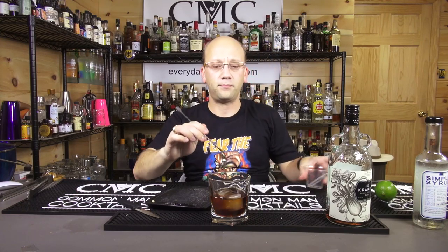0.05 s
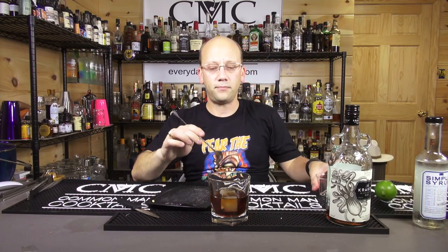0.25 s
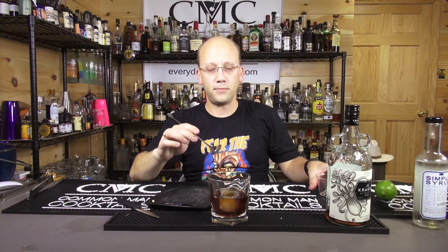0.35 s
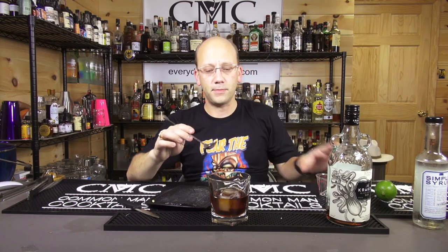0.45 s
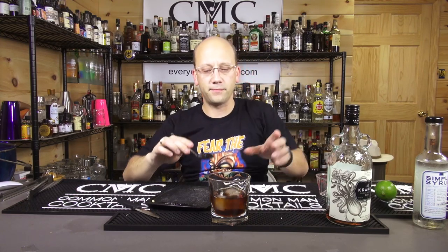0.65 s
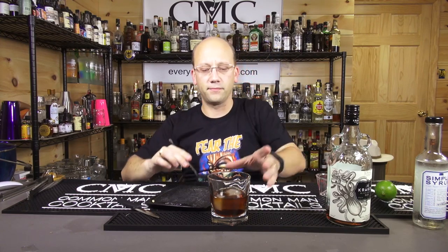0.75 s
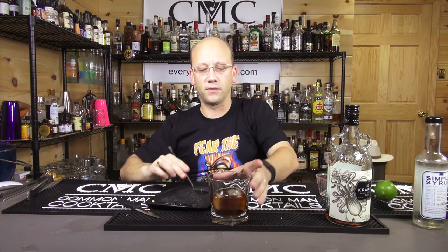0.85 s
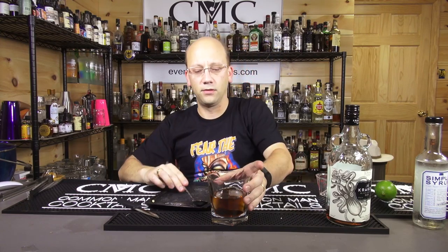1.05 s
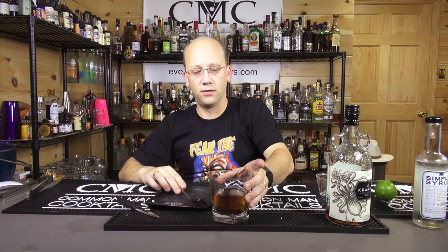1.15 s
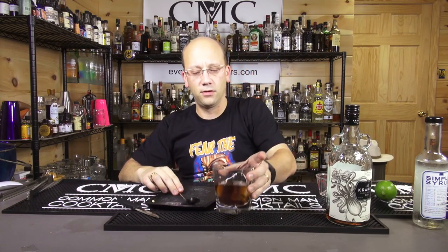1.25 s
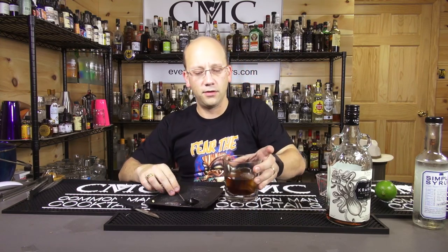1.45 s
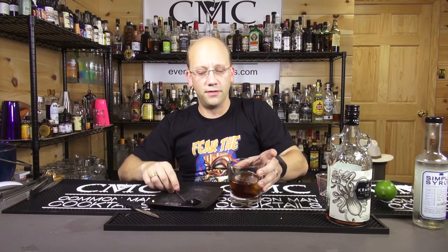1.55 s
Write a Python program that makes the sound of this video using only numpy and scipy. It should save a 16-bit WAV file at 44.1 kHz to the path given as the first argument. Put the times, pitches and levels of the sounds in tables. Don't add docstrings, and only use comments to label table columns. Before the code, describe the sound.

A glass clinks brightly at about 0.23 seconds, its ring fading over a soft set-down rumble near 0.3 and faint scuffs until 0.7. A gritty scrape at 1.0 starts ice and spoon knocking in a full tumbler, hardest from 1.25 to 1.4 with thin steely ringing, then lighter taps at 1.47 and 1.56. Wood rumbles below; quiet hum, hiss and short room reflections surround it.

```python
import sys
import numpy as np
from scipy import signal
from scipy.fft import rfft, irfft, next_fast_len
from scipy.io import wavfile
from scipy.ndimage import map_coordinates

SR = 44100
rng = np.random.default_rng(int(sys.argv[2]) if len(sys.argv) > 2 else 0)


def bounce(signal):
    frames = np.transpose(np.atleast_2d(signal))
    limited = np.clip(frames, -1, 1)
    pcm = np.round(limited * 32767).astype(np.int16)
    wavfile.write(sys.argv[1], SR, pcm)


def gain_from_decibels(decibels):
    exponent = np.asarray(decibels, float) / 20
    return 10 ** exponent


N = 70560

WET_DB = -10


def unit(x):
    return x / np.sqrt(np.mean(x ** 2) + 1e-20)


def along(points, hz):
    f, v = np.transpose(points)
    return np.interp(np.log(hz + 1), np.log(f + 1), v)


def filtered(x, response):
    m = next_fast_len(len(x) + 4096)
    return irfft(rfft(x, m) * response(np.fft.rfftfreq(m, 1 / SR)), m)[:len(x)]


def resonance(f, centre_hz, width_hz):
    drag = 1j * f * width_hz
    return drag / (centre_hz * centre_hz - f * f + drag)


def wobble(rate_hz):
    knots = rng.standard_normal(int(N * 400 / SR) + 4)
    return map_coordinates(knots, [np.arange(N) * min(rate_hz, 400) / SR])


def fade(t, t60_s):
    return gain_from_decibels(-60 * t / t60_s)


def sine(hz, t):
    return np.sin(2 * np.pi * hz * t)


def add(track, s, sound, wet_db):
    # f/Hz, t60/s
    room = [(150, 0.32), (1000, 0.38), (3000, 0.61), (8000, 0.37), (15000, 0.13)]
    wall_s = 0.0044
    hz, t, z = signal.stft(rng.standard_normal(SR // 2), SR, nperseg=256)
    decay = fade(t, along(room, hz)[:, None])
    tail = signal.istft(z * decay, SR, nperseg=256)[1]
    tail = np.pad(tail / np.linalg.norm(tail), (round(wall_s * SR), 0))
    at = round(s * SR)
    track[at:at + len(sound)] += sound
    wet = signal.fftconvolve(sound, gain_from_decibels(wet_db) * tail)[:SR]
    track[at:at + len(wet)] += wet


def floor():
    # f/Hz, level/dB
    partials = [(60.5, -65), (120, -68), (180, -67.5), (240, -75.5), (3275, -74), (3320, -81)]
    # f/Hz, density/dB per Hz
    hiss_curve = [(15, -24.5), (25, -22), (123, -5.5), (229, -11.5), (309, -8.5), (2110, -15.5),
                  (3340, -12), (3720, -16), (16000, -21.5)]
    hiss_db = -60
    t = np.arange(N) / SR
    hum = 0
    for hz, db in partials:
        level = gain_from_decibels(db + 0.5 + 1.3 * wobble(14))
        hum = hum + level * np.sin(2 * np.pi * hz * t + 0.33 * wobble(2.5))
    hiss = filtered(rng.standard_normal(N), lambda f: gain_from_decibels(along(hiss_curve, f)))
    return hum + gain_from_decibels(hiss_db) * unit(hiss)


def scuffs():
    # t/s, level/dB, hold/s, centre f/Hz, width/octaves
    rubs = [(0.988, -52.5, 0.025, 900, 0.84), (0.141, -60.5, 0.039, 890, 0.8),
            (0.153, -62, .008, 6500, 0.12), (0.253, -50.5, 0.059, 600, 0.43),
            (.52, -60.5, 0.081, 1080, 0.75), (0.543, -57, 0.004, 4030, 0.57),
            (0.563, -53, 0.011, 2500, 0.79), (.652, -47.5, .025, 1480, 1.22),
            (.653, -49.5, 0.028, 7130, 0.38), (.9335, -45.5, 0.0022, 11500, 0.74),
            (0.986, -36, 0.026, 8700, 0.98), (1.007, -28.5, .008, 3600, 0.44),
            (1.179, -49.5, 0.11, 1170, 1.06)]
    # f/Hz, level/dB, t60/s
    squeak = [(5750, -48.5, 0.34), (6340, -48.5, 0.24), (2180, -50.5, 0.13), (387.5, -42.5, 0.084),
              (600, -44, 0.079), (1090, -54, 0.17)]
    squeak_s, grit_db = 0.657, 3
    t60_s, release_share = 0.01, 2.7
    out, t = np.zeros(N + SR), np.arange(SR // 3) / SR
    for s, db, hold_s, hz, octaves in rubs:
        band = lambda f: np.exp(-0.5 * (np.log2((f + 1) / hz) / octaves) ** 2)
        grit = gain_from_decibels(grit_db * wobble(300)[:len(t)])
        rub = unit(filtered(rng.standard_normal(len(t)), band) * grit)
        rise = np.clip(t / (0.077 * hold_s), 0, 1)
        release = fade(np.maximum(t - hold_s, 0), t60_s + release_share * hold_s)
        add(out, s, gain_from_decibels(db) * rub * rise * release, WET_DB)
    ring = sum(gain_from_decibels(db) * fade(t, mode_t60_s) * sine(hz, t) for hz, db, mode_t60_s in squeak)
    add(out, squeak_s, ring * (1 - np.exp(-t / 0.005)), WET_DB)
    return out[:N]


def empty_glass():
    # f/Hz, level/dB, t60/s, partner f/Hz, partner level/dB
    pairs = [(2713, 8, 0.25, 2681, 6), (5373, 4, 0.16, 6200, -11), (8350, -20, 0.37, 8366, -24),
             (10310, -31, 0.17, 10330, -36), (12100, -28, 0.23, 11940, -28), (13450, -42, 0.16, 13470, -44)]
    # t/s, level/dB, damping (1 = free), click/dB
    clinks = [
        (0.191, -60, 0.57, -37),
        (0.2264, -16.5, 1.4, 12),
        (0.2336, -32, 2.6, 18.5),
        (.9335, -65, 1.3, -10),
        (1.5281, -31, 6.1, -19),
    ]
    # f/Hz, density/dB per Hz
    click_curve = [(100, -32), (1000, -8.5), (3700, -16.5), (5000, 5), (7000, -6), (12000, -21),
                   (16000, -28)]
    click_t60_s, click_wet_db, glass_wet_db = 0.004, -14, -20
    soft_db = -0.55
    swell_s, late_t60_s, flutter_db = 0.085, 0.47, 8
    push_db, push_s = -31, 0.045
    loud_s, loud_db = clinks[1][:2]
    lowest_hz = pairs[0][0]
    out, t = np.zeros(N + SR), np.arange(SR // 2) / SR
    for s, db, damp, click_db in clinks:
        late = (1 - np.exp(-(t / swell_s) ** 2)) * fade(t * damp, late_t60_s)
        dull_db = soft_db * (loud_db - db)
        ring = 0
        for hz, level_db, t60_s, other_hz, other_db in pairs:
            first = fade(t * damp, t60_s) * sine(hz, t)
            flutter = flutter_db * wobble(51)[:len(t)]
            partner = gain_from_decibels(other_db - level_db + flutter) * late * sine(other_hz, t)
            ring = ring + gain_from_decibels(level_db + dull_db * np.log2(hz / lowest_hz)) * (first + partner)
        burst = (4 * (t == 0) + rng.standard_normal(len(t))) * fade(t, click_t60_s)
        click = filtered(burst, lambda f: gain_from_decibels(along(click_curve, f)))
        onset = 1 - np.exp(-t / 0.00011)
        add(out, s, gain_from_decibels(db) * 1.24 * ring * onset, glass_wet_db)
        add(out, s, gain_from_decibels(db + click_db) * click / np.abs(click).max(), click_wet_db)
    add(out, loud_s, -gain_from_decibels(push_db) * np.exp(-t / push_s), wet_db=-60)
    return out[:N]


def bar_top():
    # t/s, level/dB
    set_down = [
        (0.24, -56.5),
        (0.294, -38),
        (0.376, -54.5),
        (0.404, -76),
        (0.42, -55.5),
    ]
    # t/s, level/dB
    handling = [
        (0.98, -88),
        (1.046, -41.5),
        (1.078, -43),
        (1.164, -61),
        (1.196, -42.5),
        (1.388, -28),
        (1.54, -51),
        (1.572, -41.5),
        (1.6, -47.5),
    ]
    # f/Hz, width/Hz, level/dB
    resonances = [(101, 37, 4.5), (155, 100, -1), (282.4, 40, -1.5), (520, 220, -21)]

    def wood(f):
        body = sum(gain_from_decibels(db) * resonance(f, hz, width_hz) for hz, width_hz, db in resonances)
        return body * (f / (f + 60)) ** 2

    def level(rows):
        return gain_from_decibels(np.interp(np.arange(N) / SR, *np.transpose(rows), left=-120, right=-120))

    lumps = gain_from_decibels(4.55 * wobble(30.28))
    rumble = unit(filtered(rng.standard_normal(N), wood) * lumps)
    return (level(handling) + level(set_down)) * rumble


def knocks():
    # t/s, peak/dB, centre f/Hz, treble tilt/dB per octave, ring/dB
    hits = [(1.0138, -24, 3800, 4.5, -35), (1.0358, -17.5, 1070, -1, -17), (1.0376, -14, 3080, -3.5, -28.5),
            (1.1063, -26.5, 1150, -5, -26), (1.1866, -31.5, 890, 2, -26), (1.216, -44, 940, -6, -24),
            (1.238, -24, 1240, -6.5, -19), (1.2535, -16, 2240, -9.5, -13), (1.272, -2.5, 2350, 0, -15),
            (1.3265, -2.5, 5200, 4, -16), (1.368, -16, 3570, -4, -32), (1.391, -23.5, 3800, -6, -26),
            (1.3966, -10.5, 1140, -12, -7.5), (1.3988, -9, 6000, -0.5, -19.5),
            (1.4706, -19, 1210, -7.5, -13), (1.5628, -18.5, 1330, -3, -16)]
    # f/Hz, level/dB, t60/s
    modes = [(1244, 0, .15), (1448, -6, .06), (2290, -6, .1), (3240, -8, .08), (3844, -14, .08),
             (5140, -6, .07), (6650, -20, .03), (7970, -12, .07)]
    # f/Hz, density/dB per Hz
    contact = [(100, -23), (500, -7), (1000, 5.5), (2500, 2), (6500, -2), (10000, -9), (15500, -49)]
    centre_db, centre_width = 6, 0.92
    contact_t60_s = 0.013
    crunch_db, crunch_t60_s = -12.5, 0.099
    far_mode_db, rough_rad = -5, 0.35
    out, t = np.zeros(N + SR), np.arange(SR // 3) / SR
    for s, db, hz, tilt_db, ring_db in hits:
        def colour(f):
            tilt = gain_from_decibels(tilt_db * np.log2(1 + f / 2500))
            lift = 1 + gain_from_decibels(centre_db) * resonance(f, hz, centre_width * hz)
            return gain_from_decibels(along(contact, f)) * tilt * lift

        crunch = gain_from_decibels(crunch_db + 4.45 * wobble(356)[:len(t)]) * fade(t, crunch_t60_s)
        onset = 1 - np.exp(-t / 0.00017)
        burst = rng.standard_normal(len(t)) * (fade(t, contact_t60_s) + crunch) * onset
        crack = filtered(burst, colour)
        wander = rough_rad * wobble(68)[:len(t)]
        ring = 0
        for f, level_db, t60_s in modes:
            level_chance, pitch_chance = rng.standard_normal(2)
            mode_db = level_db + 2.3 * level_chance + far_mode_db * abs(np.log2(f / hz))
            mode_hz = f * (1 + 0.0033 * pitch_chance)
            ring = ring + gain_from_decibels(mode_db) * fade(t, t60_s) * np.sin(2 * np.pi * mode_hz * t + wander)
        add(out, s, gain_from_decibels(db) * (crack / np.abs(crack).max() + gain_from_decibels(ring_db) * ring), WET_DB)
    return out[:N]


def spoon():
    # f/Hz, level/dB, t60/s
    modes = [(5717, 0, .35), (9711, -16, .3), (10350, -10, .4), (11830, -6, .13), (13300, -12, .12)]
    # t/s, level/dB
    hits = [
        (1.272, -43),
        (1.3263, -44),
        (1.3983, -39.5),
        (1.5625, -57),
    ]
    out, t = np.zeros(N + SR), np.arange(SR // 2) / SR
    for s, db in hits:
        ring = 0
        for hz, level_db, t60_s in modes:
            ring = ring + gain_from_decibels(level_db + rng.normal(0, 2.7)) * fade(t, t60_s) * sine(hz, t)
        add(out, s, gain_from_decibels(db) * ring, WET_DB)
    return out[:N]


def scene():
    return (floor() + scuffs() + empty_glass() + bar_top() + knocks() + spoon())[None]


def band_limit(x):
    return signal.sosfilt(signal.butter(12, 16860, fs=SR, output="sos"), x)


def record(dry):
    top_hz = 16000
    mix = filtered(dry[0], lambda f: 1 / (1 + (f / top_hz) ** 30))[None]
    return band_limit(mix)


dry = scene()
out = record(dry)
bounce(out)
```